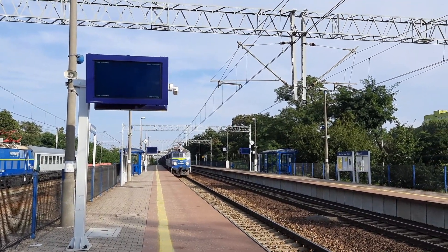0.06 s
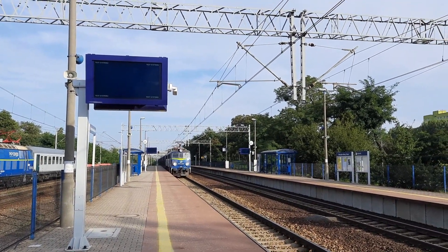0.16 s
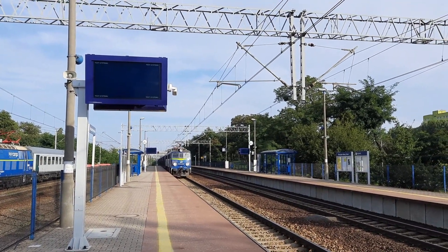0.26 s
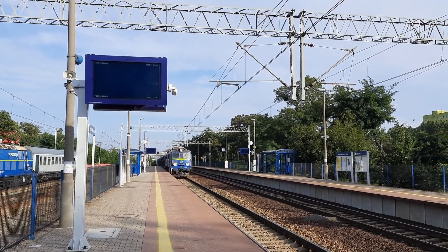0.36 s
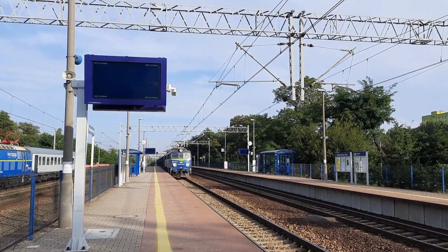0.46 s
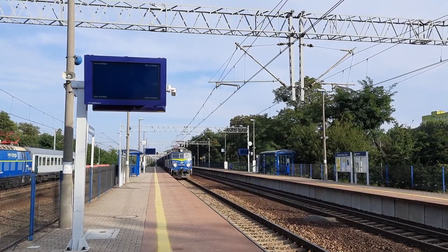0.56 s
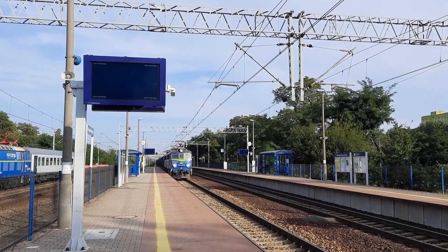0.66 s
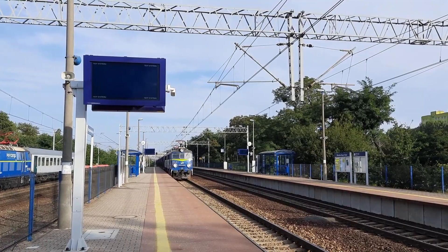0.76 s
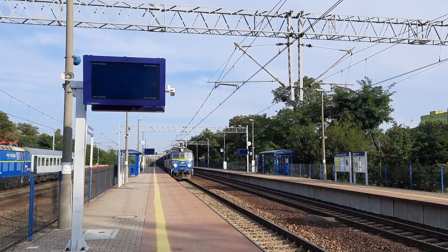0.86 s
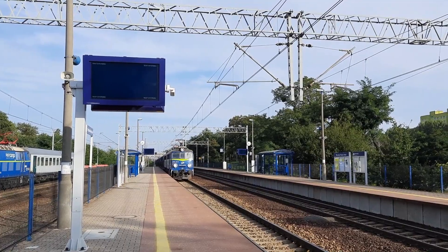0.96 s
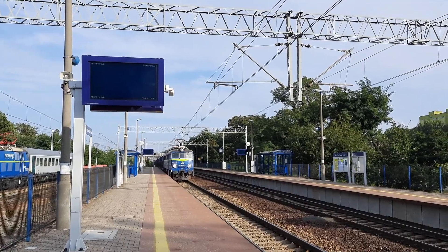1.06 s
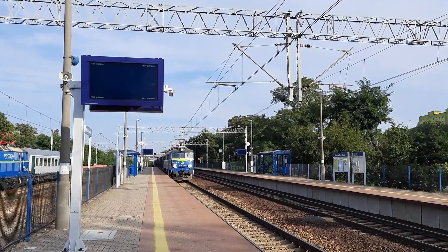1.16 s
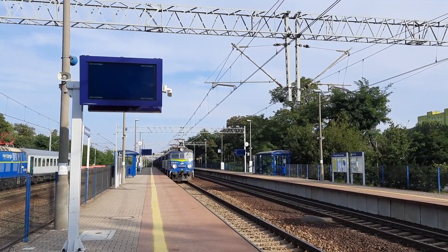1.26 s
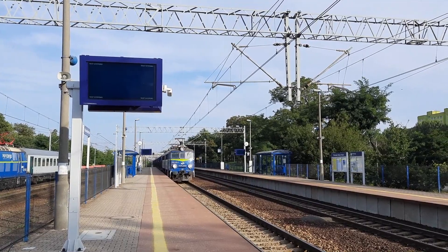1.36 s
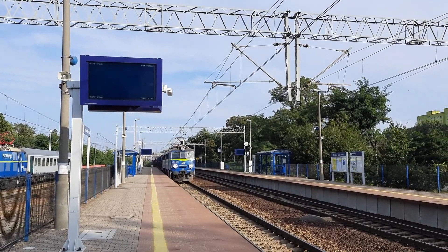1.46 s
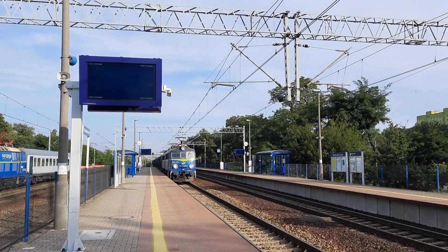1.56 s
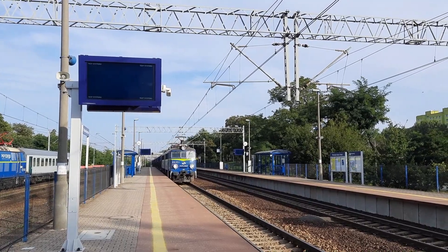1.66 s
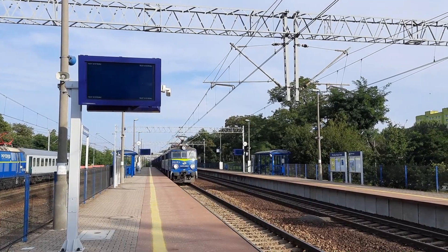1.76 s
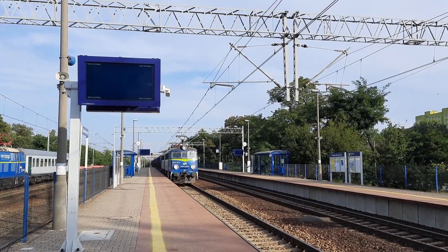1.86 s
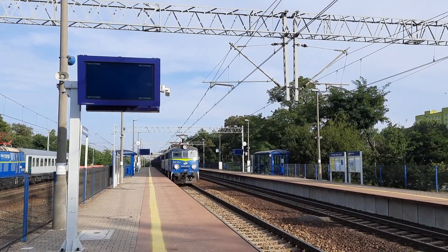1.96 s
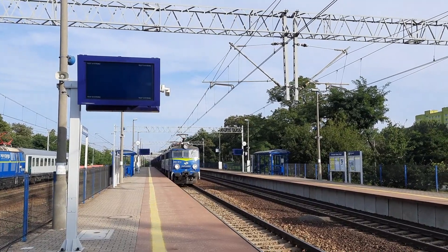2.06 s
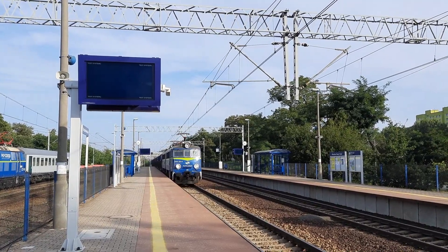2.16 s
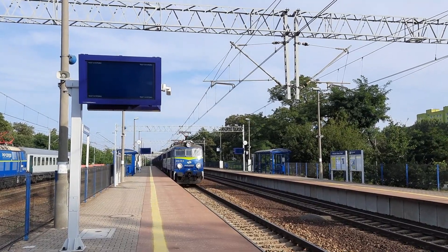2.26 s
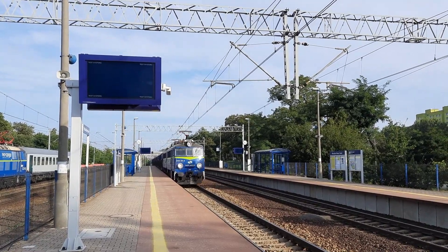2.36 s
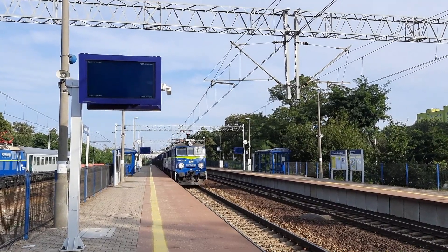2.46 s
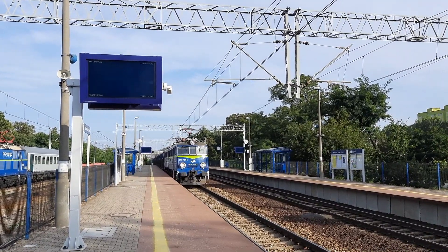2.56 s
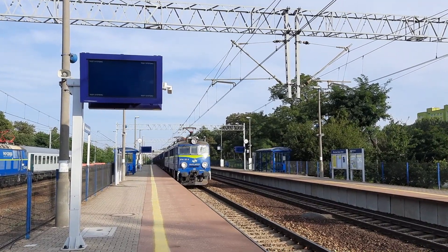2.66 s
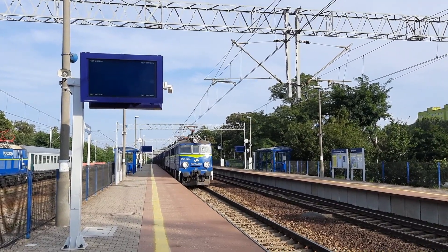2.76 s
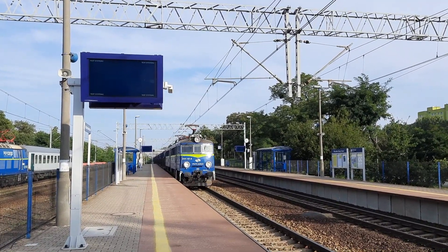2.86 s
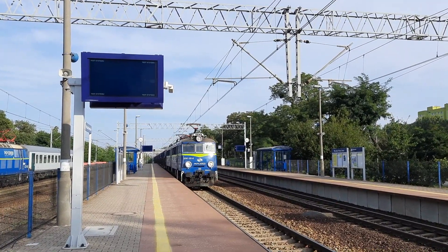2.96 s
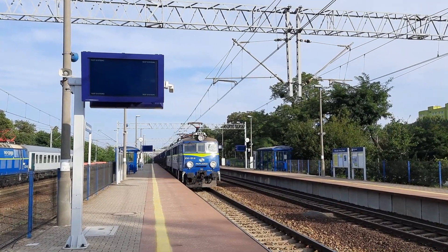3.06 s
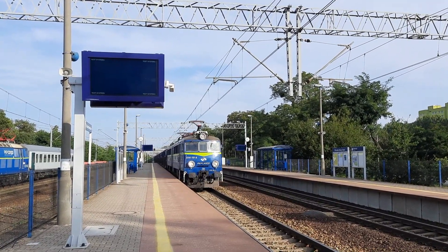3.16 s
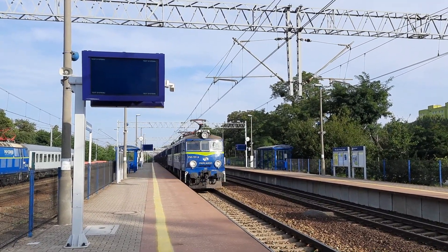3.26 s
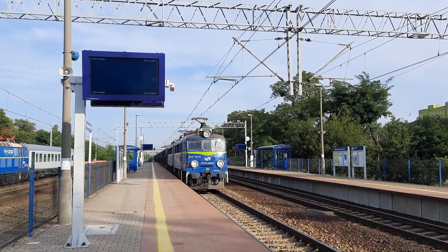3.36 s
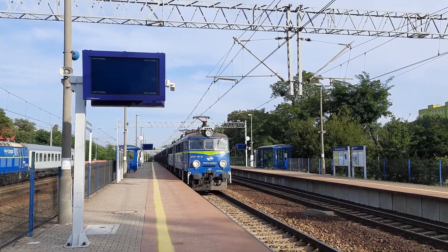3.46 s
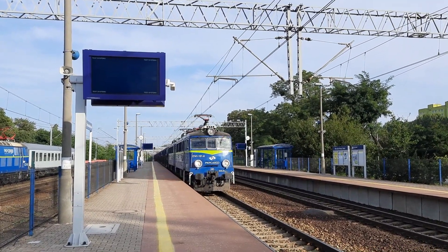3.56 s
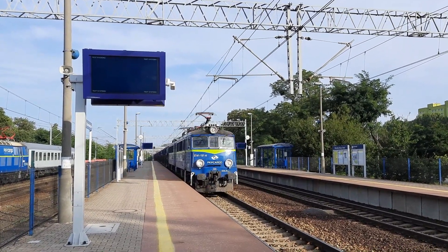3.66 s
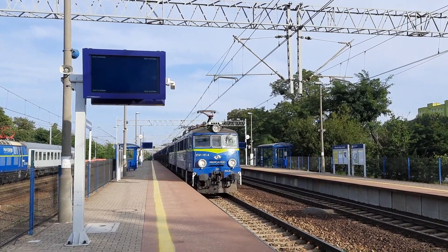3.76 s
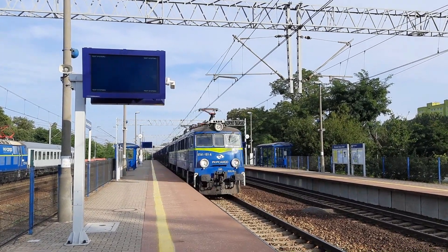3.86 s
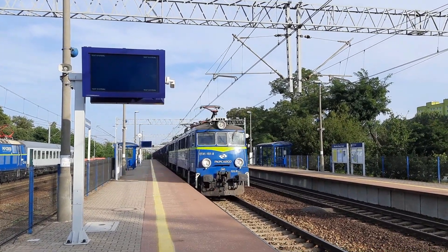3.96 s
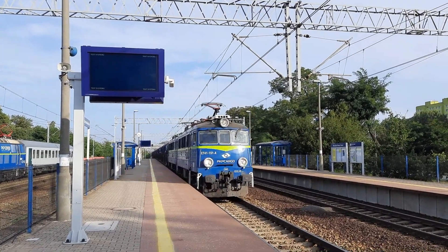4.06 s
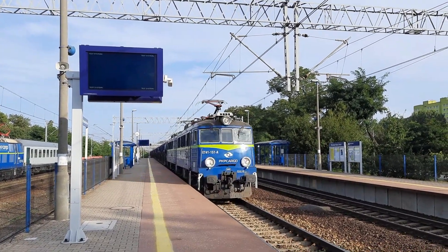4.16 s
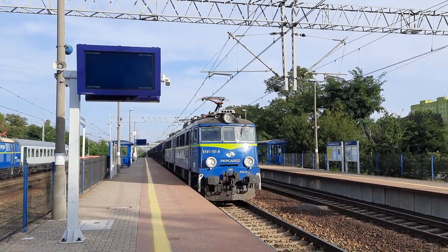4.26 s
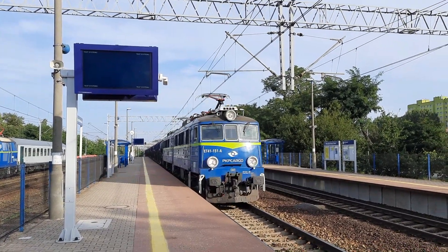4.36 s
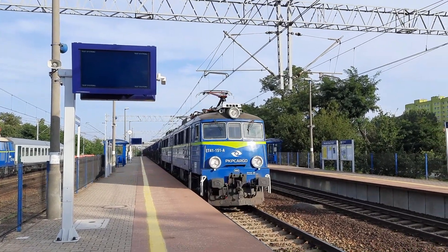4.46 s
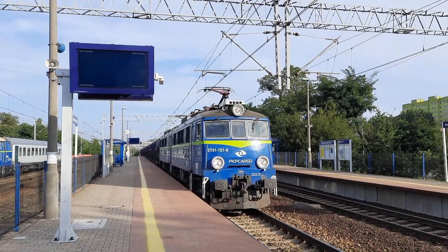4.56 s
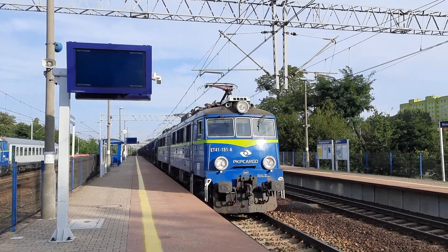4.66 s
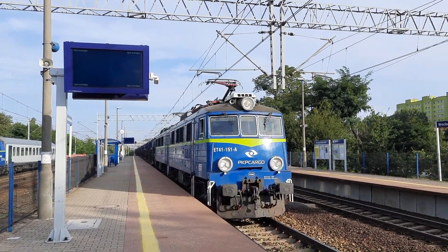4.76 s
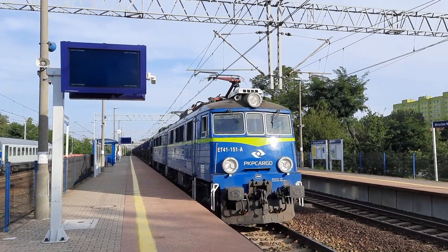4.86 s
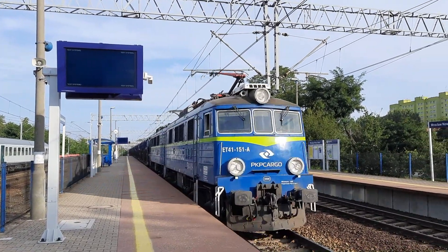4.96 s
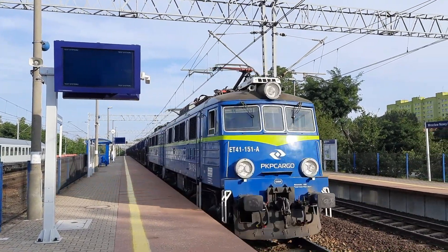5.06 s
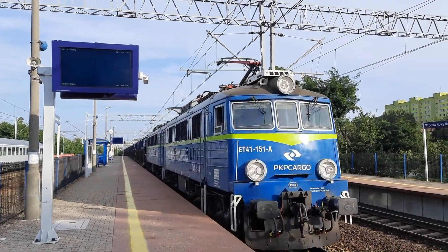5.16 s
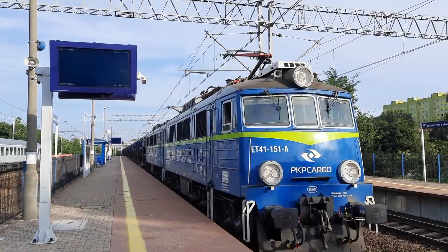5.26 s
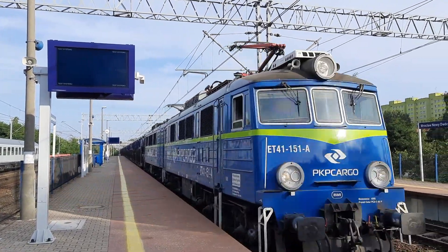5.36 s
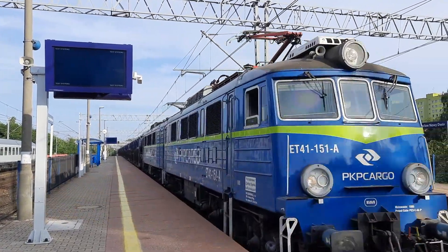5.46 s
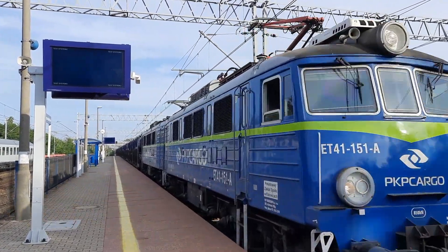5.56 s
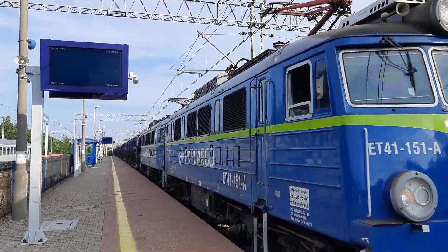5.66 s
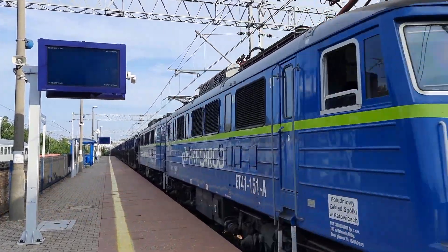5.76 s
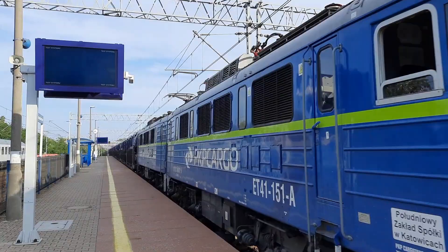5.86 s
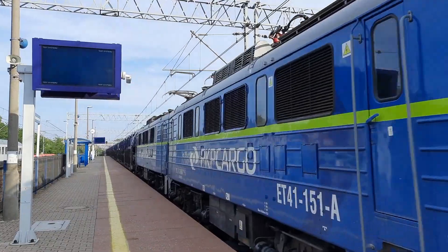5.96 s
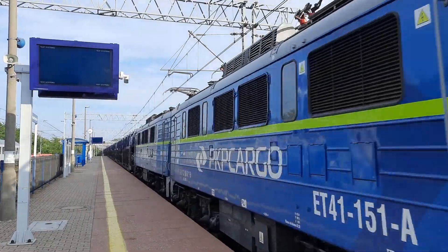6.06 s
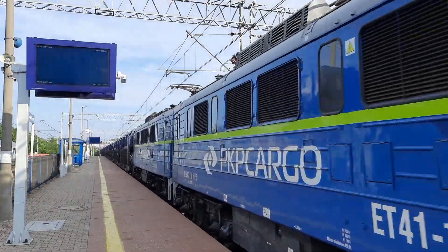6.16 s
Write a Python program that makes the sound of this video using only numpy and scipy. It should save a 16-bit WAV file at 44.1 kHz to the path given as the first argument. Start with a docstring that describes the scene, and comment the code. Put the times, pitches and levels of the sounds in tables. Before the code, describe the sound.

Outdoors at a station platform, a fixed stereo microphone hears a heavy electric train approach. Wavering motor hum and soft wheel rumble start distant; a sharp bright steel scrape flicks past early with a short echo, then three dull thuds. The roar and hiss build continuously until the locomotive passes very close, humming strongest with rushing cooling air and tiny high chirps, slightly heavier on the right.

```python
"""Electric freight train arriving at a platform

Drives hum on multiples of a pitch that climbs as the train gathers speed, then levels off close by.
Wheel roar is shaped noise that grows as the distance shrinks; louvre air swells as it passes.
Three dull thuds, bright flange scrapes (noise in wheel modes) and faint wheel singing lie on top;
platforms and trees answer the scrapes through a decaying noise echo.
"""
import sys
import numpy as np
from scipy import signal
from scipy.fft import rfft, irfft, next_fast_len
from scipy.io import wavfile
from scipy.ndimage import uniform_filter1d, map_coordinates

SR = 44100
rng = np.random.default_rng(int(sys.argv[2]) if len(sys.argv) > 2 else 0)


def transcribe(signal):
    """Save signal, clipped to [-1, 1], as a 16-bit WAV file at the path in sys.argv[1]."""
    frames = np.atleast_2d(signal).T
    limited = np.clip(frames, -1, 1)
    pcm = np.round(limited * 32767).astype(np.int16)
    wavfile.write(sys.argv[1], SR, pcm)


N = 274302

# Strong hum lines. Each row: time in seconds, nominal levels of orders 2, 3 and 4 in dB.
HUM_LEVELS = [(0, -38, -46, -43), (0.35, -34.5, -35, -32.5), (0.7, -42.5, -42, -36),
              (1.15, -31.5, -39, -30.5), (2, -37, -37.5, -33), (2.45, -31.5, -41, -24.5),
              (2.95, -31.5, -42, -22), (3.25, -29.5, -27, -26.5), (3.55, -30, -30, -34),
              (4.1, -21, -34, -22.5), (4.8, -24.5, -28.5, -25.5), (5.1, -24, -25, -22),
              (5.45, -26.5, -27.5, -21.5), (5.87, -15, -20.5, -18.5), (6.22, -23, -30.5, -16)]
# Weaker hum lines. Each row: multiple of the drive pitch, nominal level alongside in dB,
# loss per doubling of distance in dB, gain through the open louvres in dB.
HUM_OVERTONES = [(1, -49, 12, 14), (5.95, -40.5, 5.5, 9), (8, -52, 7, 4), (9.92, -54, 11, 5)]
# Wheel noise spectra, low to high. Each row: frequency in Hz, relative density in dB per Hz.
RUMBLE_SPECTRUM = [(20, -40), (32, -24), (42, -8.5), (58, -1), (90, 0.5), (135, 1.5), (175, -4.5),
                   (240, -13.5), (500, -77.5)]
ROAR_SPECTRUM = [(120, -38), (165, -1), (183, 0), (200, 4.5), (235, 4), (262, -1), (295, 5), (345, -3.5),
                 (385, -12.5), (430, 5), (600, -67)]
GROWL_SPECTRUM = [(300, -26.5), (390, -0.5), (450, 0), (490, -1.5), (545, -13.5), (590, -8.5), (650, -12),
                  (720, -21), (1000, -52.5)]
RAIL_SPECTRUM = [(450, -11.5), (700, -9), (780, 0.5), (1030, 2.5), (1280, 0.5), (1500, -6.5), (1900, -8.5),
                 (3500, -65)]
HISS_SPECTRUM = [(900, -36), (1600, 1), (2050, 0.5), (2450, 3.5), (3000, -1), (3450, 1), (4100, -2.5),
                 (4650, -4), (5200, -9.5), (6500, -14.5), (7500, -15), (8700, -23.5), (15000, -54.5)]
TOP_HISS_SPECTRUM = [(4000, -20), (7400, 3.5), (8800, -11), (10000, -10.5), (12000, 4), (13600, -6),
                     (15700, -5)]
# Cooling air at the side louvres. Each row: frequency in Hz, relative density in dB per Hz.
LOUVRE_SPECTRUM = [(600, -14), (900, -15.5), (1400, 12), (1600, -4), (2100, -13.5), (3000, -6), (4200, -13),
                   (5800, -12.5), (9000, -45.5)]
# Wheels dropping into dips. Each row: centre in seconds, level in dB, bell width (sigma) in seconds.
TRACK_THUDS = [(1.336, -34, 0.021), (1.796, -33.5, 0.019), (1.954, -30, 0.058)]
# Flange scrapes. Each row: start in seconds, nominal level in dB, length in seconds,
# sizzle relative to ring in dB, wheel pitch as a ratio.
FLANGE_SCRAPES = [(.7, -39.5, .01, -10, 0.92), (.709, -29.7, .044, -8.5, 1), (.748, -47, .03, 7, 1.1),
                  (5.237, -41, .024, -.5, 1.055), (5.262, -50.5, .058, 3.5, 1.055),
                  (5.322, -52.5, .025, 11, 1.055), (5.345, -60, .032, 7, 1.055),
                  (5.961, -58, .06, 2.5, 1.1)]
# Wheel modes at pitch ratio 1. Each row: frequency in Hz, width in Hz, relative level in dB.
WHEEL_MODES = [(4500, 300, -15), (4900, 350, -16), (5420, 300, -13), (6310, 30, -6), (6660, 45, -2),
               (6810, 40, -6), (6945, 35, 2), (6995, 40, 3), (7076, 35, 1), (7000, 900, -17),
               (7380, 110, -7), (7650, 300, -10)]
# Steel on steel. Each row: frequency in Hz, relative density in dB per Hz.
SIZZLE_SPECTRUM = [(3800, -29), (5500, -8), (8000, -9.5), (9000, -11), (10500, -10), (11600, 0.5),
                   (12700, 1), (13700, -2.5), (14500, -4.5), (15600, -8.5)]
# Thin wheel chirps. Each row: centre in seconds, level in dB, bell width (sigma) in seconds.
WHEEL_CHIRPS = [(4.92, -58, .008), (4.98, -54, .009), (5.438, -49, .008), (5.505, -55, .018),
                (6.013, -58, .012), (6.166, -55, .015)]
# Echo of platforms and trees. Each row: frequency in Hz, time to fall by 60 dB in seconds.
STATION_DECAY = [(200, .7), (6000, 0.66), (14000, 0.49)]
# Stereo image. Each row: frequency in Hz, left-right correlation from -1 to 1.
STEREO_LIKENESS = [(40, .71), (90, 0.7), (200, 0.97), (450, 0.93), (700, 0.32), (1000, 0.65),
                   (1400, -0.063), (1700, 0.14), (2050, -0.075), (2450, 0.45), (3000, -0.25), (3450, 0.33),
                   (4000, -0.14), (4600, 0.22), (5200, -0.19), (6100, 0.25), (7000, -0.3), (7600, 0.14),
                   (8600, -.18), (13000, 0.008)]

# Approach at constant speed; the effective distance allows for the length of the train.
SPEED_M_PER_S, ARRIVAL_S, ALONGSIDE_M = 10.18, 5.885, 26.35
# Drive pitch; the ceiling stands for the Doppler drop that cancels the climb close by.
START_HZ, RISE_HZ_PER_S, LEVEL_OFF_HZ = 102.05, 0.93, 106.7
SLOWER_SET_RATIO = 0.97  # second motor set, beats against the first
LOUVRE_PASS_S, LOUVRE_SIDE_M, LOUVRE_ABREAST_DB = 5.95, 6.5, -40.5
SING_START_DB, SING_FADE_DB_PER_S = -61, 2.5
# Rougher rail: bell centre and sigma; gain is full on the hiss, half on the rail band.
ROUGH_RAIL_S, ROUGH_RAIL_SIGMA_S, ROUGH_RAIL_DB = 2.45, 0.3, 2
TOP_HISS_ALONGSIDE_DB, ABSORB_DB_PER_M = -60.3, 0.29  # absorption by the air
TOP_HZ = 15750


def amp(db):
    """Decibels to gain."""
    return 10 ** (np.asarray(db) / 20)


def unit(x):
    """Scale to rms 1."""
    return x / np.sqrt(np.mean(x ** 2) + 1e-20)


def seconds():
    """Time of each sample in s."""
    return np.arange(N) / SR


def along(points, hz):
    """Interpolate (Hz, value) points on a log frequency axis."""
    point_hz, values = np.transpose(points)
    return np.interp(np.log(hz + 1), np.log(point_hz + 1), values)


def curves(rows):
    """One interpolated value per sample for each column after the time."""
    knot_s, *columns = np.transpose(rows)
    return [np.interp(seconds(), knot_s, column) for column in columns]


def wobble(knots_per_s):
    """Random spline of rms about 1, held in 32-sample steps."""
    knots = rng.standard_normal(4096)
    positions = np.arange(0, N, 32) * knots_per_s / SR
    curve = unit(map_coordinates(knots, [positions], mode="wrap"))
    return curve.repeat(32)[:N]


def swell(centre_s, sigma_s):
    """Gaussian rise and fall, peak 1."""
    return np.exp(-0.5 * ((seconds() - centre_s) / sigma_s) ** 2)


def stroke(start_s, length_s, rise_s=0.0028, fall_s=0.0052):
    """Contact envelope: catches, holds and lets go, with tanh edges."""
    t = seconds() - start_s
    return (1 + np.tanh(t / rise_s)) * (1 - np.tanh((t - length_s) / fall_s)) / 4


def filtered(x, response):
    """Apply a gain given as a function of Hz, by zero-padded FFT."""
    size = next_fast_len(N + SR // 4)
    spectrum = rfft(x, size) * response(np.fft.rfftfreq(size, 1 / SR))
    return irfft(spectrum, size)[..., :N]


def spread(pair, gain):
    """Colour two unrelated signals and mix them to the tabled left-right correlation, rms 1."""
    def response(hz):
        turn = np.arccos(np.clip(along(STEREO_LIKENESS, hz), -1, 1)) / 2
        return gain(hz) * np.array([np.cos(turn), np.sin(turn)])
    mid, side = filtered(pair, response)
    return unit(np.array([mid + side, mid - side]))


def rush(spectrum, patchy_db):
    """Shaped stereo noise, rms 1, with random gain patches in time and frequency."""
    z = signal.stft(rng.standard_normal((2, N)), nperseg=512)[2]
    field = rng.standard_normal(z.shape[1:])
    field = uniform_filter1d(field, size=5, axis=0)
    field = uniform_filter1d(field, size=12, axis=1)
    pair = signal.istft(z * amp(patchy_db * unit(field)), nperseg=512)[1][:, :N]
    return spread(pair, lambda hz: amp(along(spectrum, hz)))


def rubbed(modes):
    """Friction noise through resonant modes, rms 1."""
    def gain(hz):
        return sum(amp(db) / (1 + (2 * (hz - centre_hz) / width_hz) ** 2)
                   for centre_hz, width_hz, db in modes)
    return spread(rng.standard_normal((2, N)), gain)


def distance():
    """Effective distance in m: shrinks until alongside, then holds."""
    ahead_m = SPEED_M_PER_S * np.maximum(ARRIVAL_S - seconds(), 0)
    return np.hypot(ahead_m, ALONGSIDE_M)


def approach(alongside_db, doubling_db):
    """Level in dB, losing doubling_db per doubling of distance."""
    return alongside_db - doubling_db * np.log2(distance() / ALONGSIDE_M)


def abreast():
    """How squarely the louvres face the listener: near 0 far off, 1 as they pass."""
    offset_m = SPEED_M_PER_S * (seconds() - LOUVRE_PASS_S)
    return LOUVRE_SIDE_M ** 2 / (offset_m ** 2 + LOUVRE_SIDE_M ** 2)


def fading(far_db=2.2, knots_per_s=12):
    """Wavering gain of a hum line through the air, deeper with distance."""
    depth_db = far_db * distance() / distance().max()
    return amp(depth_db * wobble(knots_per_s))


def drive_order(phase, rough, flutter_per_s, width, slower):
    """One hum line: clean core, slower motors, beating of many axles, opposed left-right scatter."""
    beating = wobble(flutter_per_s) + 1j * wobble(flutter_per_s)
    scatter = wobble(flutter_per_s / 2) + 1j * wobble(flutter_per_s / 2)
    start, slow_start = rng.uniform(0, 2 * np.pi, size=2)
    slow_set = np.exp(1j * ((SLOWER_SET_RATIO - 1) * phase + slow_start))
    line = 1 + slower * slow_set + rough * beating + width * scatter * np.array([[1], [-1]])
    return fading() * unit(np.real(line * np.exp(1j * (phase + start))))


def drives():
    """Motors and gears hum on multiples of one pitch that climbs to a ceiling."""
    pitch_hz = np.minimum(START_HZ + RISE_HZ_PER_S * seconds(), LEVEL_OFF_HZ)
    phase = 2 * np.pi * np.cumsum(pitch_hz * (1 + 0.002 * wobble(5))) / SR
    second_db, third_db, fourth_db = curves(HUM_LEVELS)
    hum = amp(second_db - 0.2) * drive_order(
        2 * phase, rough=0.12, flutter_per_s=28, width=0.042, slower=0.25)
    hum += amp(third_db + 0.3) * drive_order(
        3 * phase, rough=0.65, flutter_per_s=34, width=0.08, slower=0.35)
    hum += amp(fourth_db - 0.2) * drive_order(
        4 * phase, rough=0.13, flutter_per_s=24, width=0.06, slower=0.16)
    for multiple, alongside_db, doubling_db, louvre_db in HUM_OVERTONES:
        level_db = approach(alongside_db, doubling_db) + louvre_db * abreast()
        hum += amp(level_db) * drive_order(
            multiple * phase, rough=0.45, flutter_per_s=20, width=0.38, slower=0.1)
    return hum


def wheels():
    """Rough treads shake ground, sleepers, bogies and rails, each in its own register."""
    rough_db = ROUGH_RAIL_DB * swell(ROUGH_RAIL_S, ROUGH_RAIL_SIGMA_S)
    rail_db = approach(alongside_db=-36, doubling_db=8.3) + rough_db / 2 + 0.72 * wobble(28)
    hiss_db = approach(alongside_db=-38.7, doubling_db=7.7) + rough_db + 0.63 * wobble(32)
    top_db = TOP_HISS_ALONGSIDE_DB - ABSORB_DB_PER_M * (distance() - ALONGSIDE_M)
    sound = amp(approach(alongside_db=-32.5, doubling_db=8.5)) * rush(RUMBLE_SPECTRUM, patchy_db=0)
    sound += amp(approach(alongside_db=-22.3, doubling_db=12.5)) * rush(ROAR_SPECTRUM, patchy_db=-0.5)
    sound += amp(approach(alongside_db=-22.5, doubling_db=9)) * rush(GROWL_SPECTRUM, patchy_db=1.04)
    sound += amp(rail_db) * rush(RAIL_SPECTRUM, patchy_db=1.1)
    sound += amp(hiss_db) * rush(HISS_SPECTRUM, patchy_db=1.5)
    return sound + amp(top_db) * rush(TOP_HISS_SPECTRUM, patchy_db=0.5)


def louvres():
    """Cooling-air noise from the side louvres, swelling as they pass."""
    return amp(LOUVRE_ABREAST_DB) * abreast() * rush(LOUVRE_SPECTRUM, patchy_db=2.5)


def flanges():
    """A flange catches the rail and chatters; its wheel modes ring under a bright sizzle."""
    sizzle = rush(SIZZLE_SPECTRUM, patchy_db=1.5)
    sound = np.zeros((2, N))
    for start_s, db, length_s, sizzle_db, pitch in FLANGE_SCRAPES:
        ring = rubbed([(hz * pitch, width_hz, mode_db) for hz, width_hz, mode_db in WHEEL_MODES])
        sound += amp(db) * stroke(start_s, length_s) * (ring + amp(sizzle_db) * sizzle)
    chatter_db = 2.3 + 2.2 * wobble(160)
    return sound * amp(chatter_db)


def thuds():
    """A wheel dropping into a dip gives the ground a dull push: a bell of low noise."""
    ground = rush(RUMBLE_SPECTRUM, patchy_db=-0.5)
    push = sum(amp(db) * swell(centre_s, sigma_s) for centre_s, db, sigma_s in TRACK_THUDS)
    return push * ground


def singing():
    """Wheel modes sing in a fading layer; two squeal bands grow with approach; chirps are brief."""
    sound = amp(SING_START_DB - SING_FADE_DB_PER_S * seconds()) * rubbed(WHEEL_MODES)
    squeal_db = approach(alongside_db=-68, doubling_db=12.5)
    sound += amp(squeal_db + 5 * wobble(28)) * rubbed([(13700, 200, 0)])
    sound += amp(squeal_db - 4 + 3 * wobble(28)) * rubbed([(11850, 300, 0)])
    chirping = sum(amp(db) * swell(centre_s, sigma_s) for centre_s, db, sigma_s in WHEEL_CHIRPS)
    return sound + chirping * rubbed([(13670, 130, 0)])


def station(x):
    """Echo of platforms and trees: convolution with noise that dies faster in the treble."""
    hz, t, z = signal.stft(rng.standard_normal((2, SR * 3 // 4)), SR, nperseg=256)
    decay_db = -60 * t / along(STATION_DECAY, hz)[:, None]
    tail = signal.istft(z * amp(decay_db), SR, nperseg=256)[1]
    return signal.fftconvolve(x, tail / np.linalg.norm(tail[0]), axes=1)[:, :N]


def scene():
    """Sum of all layers, 0.9 dB stronger on the right, where the track runs."""
    scrapes = flanges()
    train = drives() + wheels() + louvres() + thuds() + singing()
    train = train + scrapes + amp(-9.5) * station(scrapes)
    return train * amp([[-0.45], [0.45]])


def record(dry):
    """Band limit: nothing passes from TOP_HZ up."""
    return filtered(dry, lambda hz: hz < TOP_HZ)


dry = scene()
out = record(dry)
transcribe(out)
```